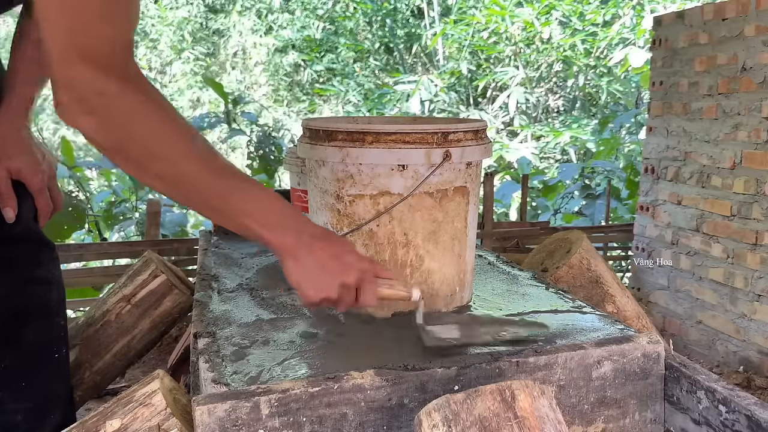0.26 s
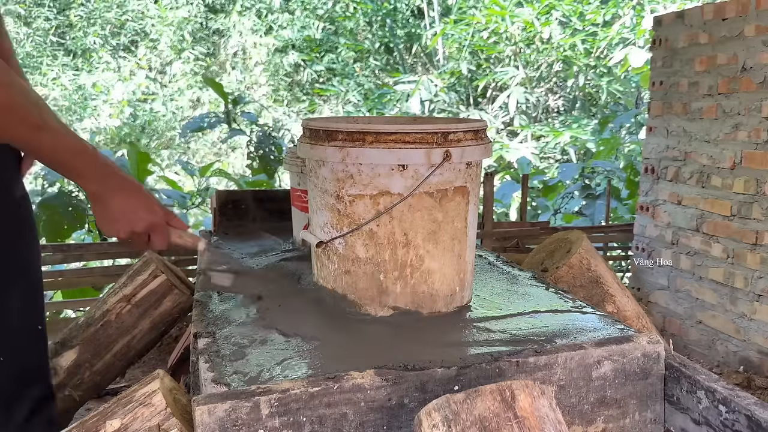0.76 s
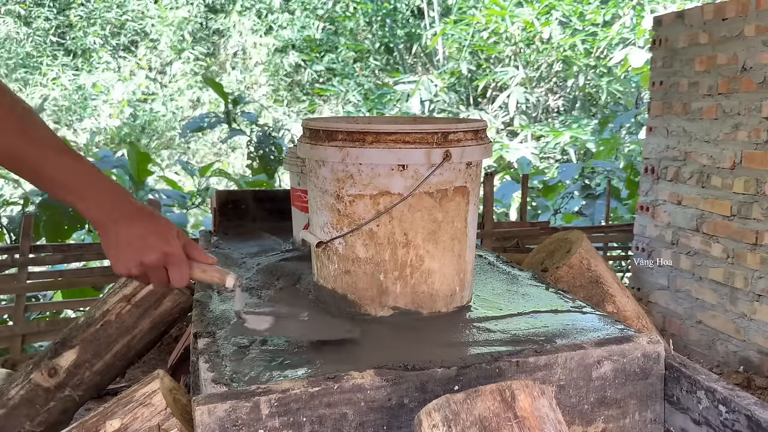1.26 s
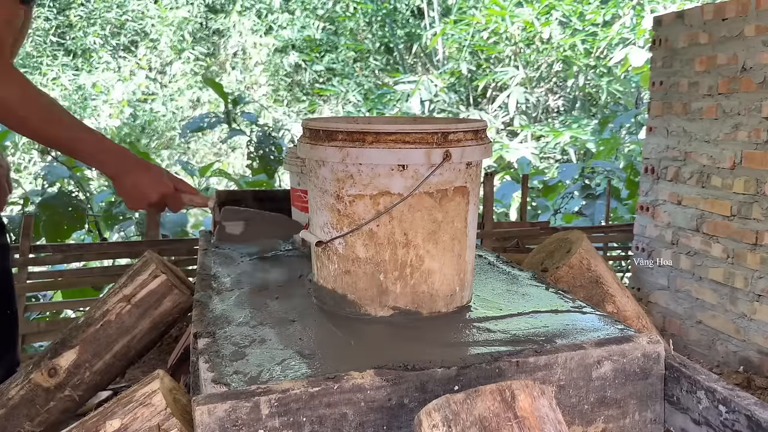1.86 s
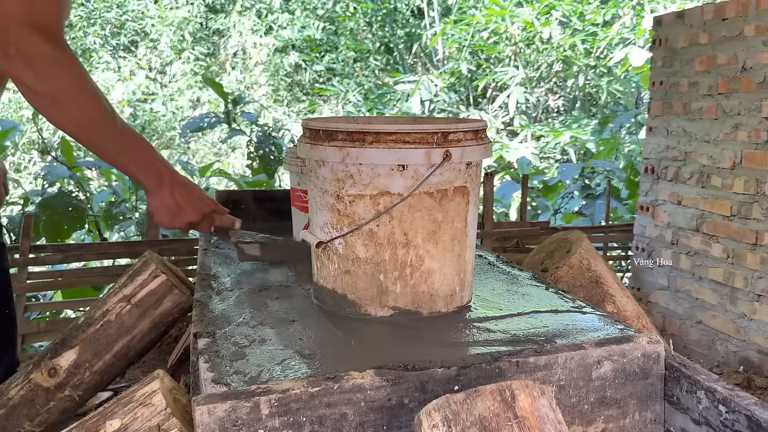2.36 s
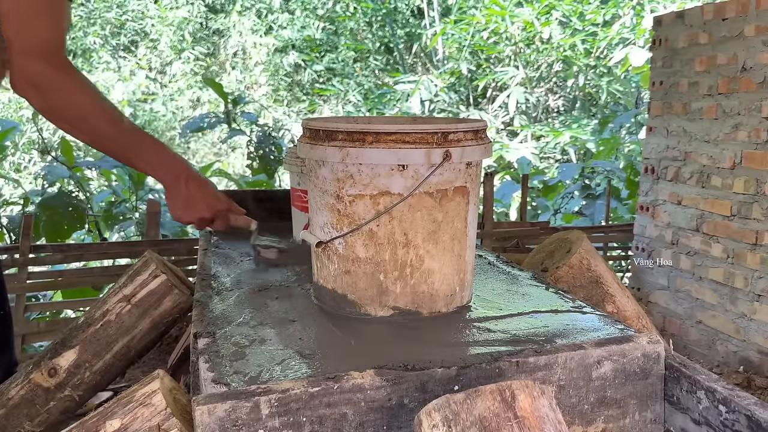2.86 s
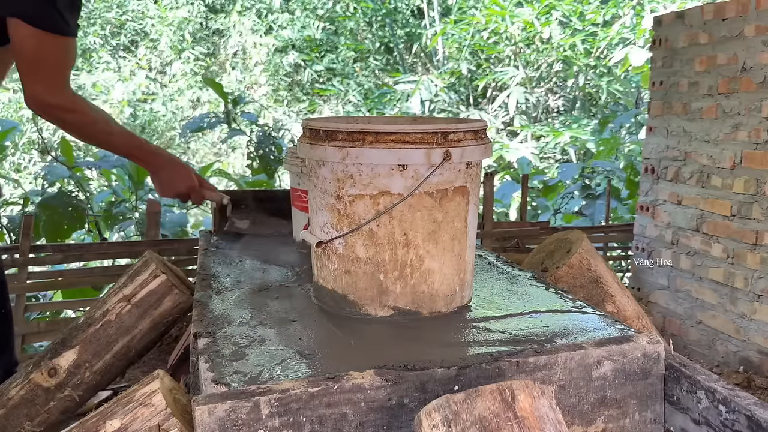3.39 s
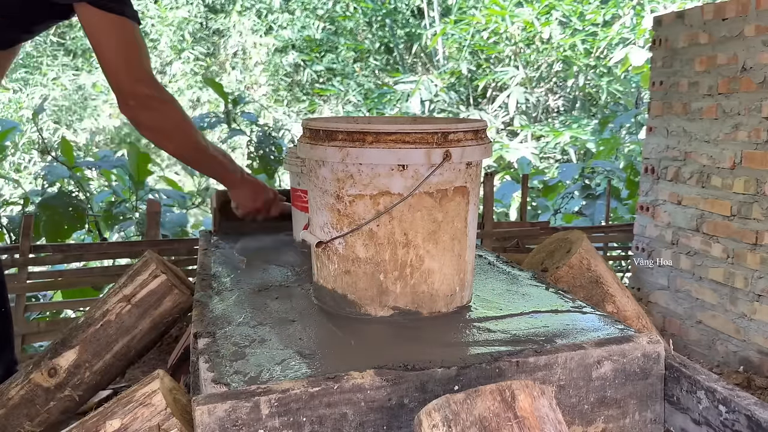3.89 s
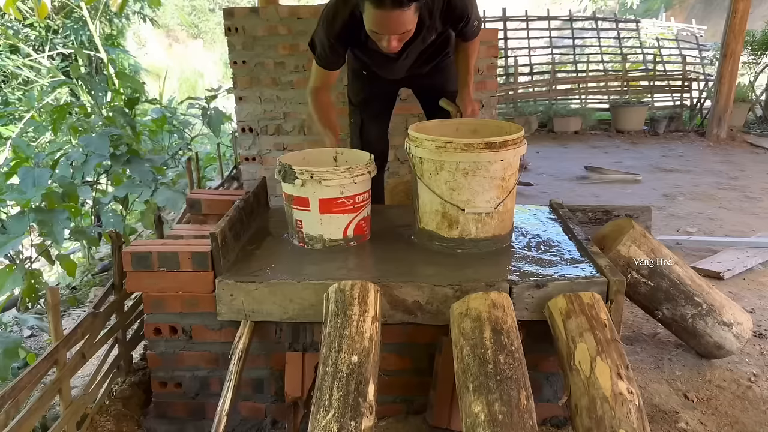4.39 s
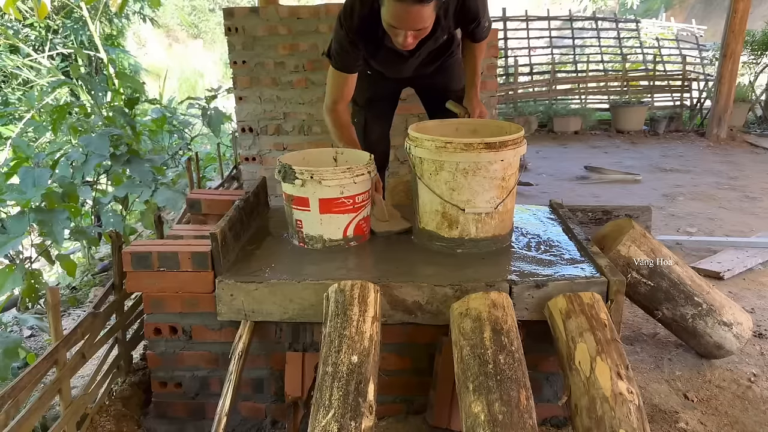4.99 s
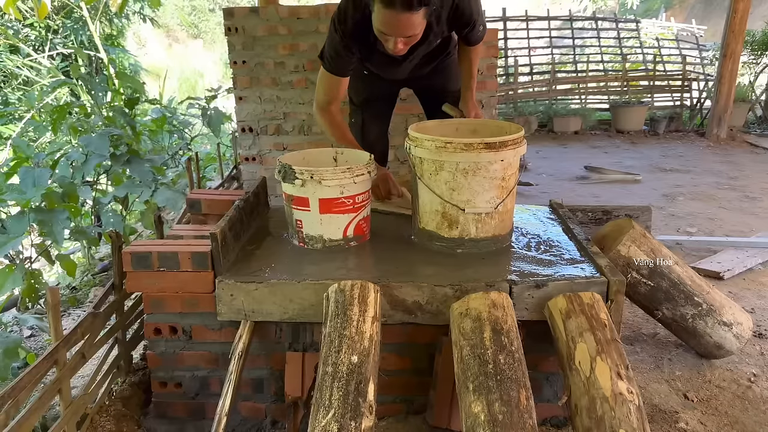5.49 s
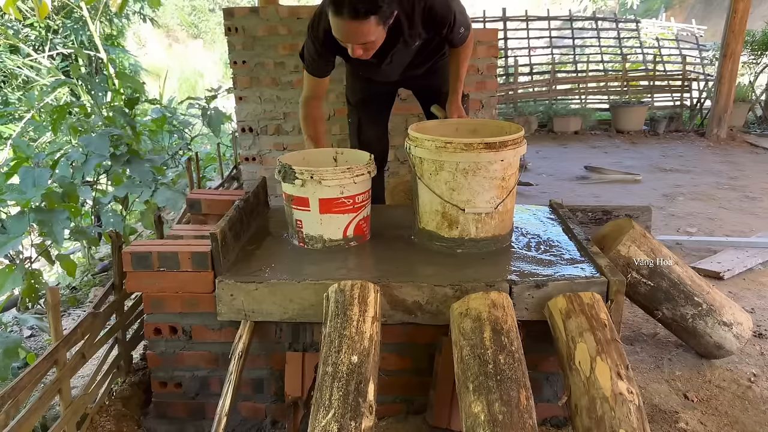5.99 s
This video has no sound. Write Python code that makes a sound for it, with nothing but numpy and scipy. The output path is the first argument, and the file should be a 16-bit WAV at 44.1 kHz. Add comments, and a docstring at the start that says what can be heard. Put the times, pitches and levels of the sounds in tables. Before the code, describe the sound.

A close, nearly dry outdoor stereo scene, the work leaning left, with continuous cricket trills and a blurred insect chorus very high up over quiet rumbling air and a faint low drone. After soft bumps, a steel trowel hits wet mortar hard at 0.45 s and skips in a rapid stutter to about 0.85 s, with a hollow bucket knock and short groans. A slap and scrape come at 1.5 s, the strongest clack and wet thud at 2.07 s, more slaps at 2.33 and 2.6 s, then a juddering, singing drag from 2.8 to 3.1 s. Lighter touches and a bucket bump follow to 3.7 s. Sound fades to silence around 4 s, then returns with altered, slightly stronger insects. Two faint bird notes sound at 4.5 and 4.8 s; light taps and low bucket knocks cluster at 4.7-5.1 s, a soft scuff at 5.2 s, a final knock and catch near 5.9 s.

```python
"""In a garden, a steel trowel taps, slaps and scrapes wet mortar on a slab while insects shrill in the bushes.
Touches and strokes are shaped noise through the damped modes of the blade, with pitched rings and groans.
Sinking tones make the mortar thuds, low hollow notes the bumped buckets, and a short noise tail the yard.
Behind lie cricket trills, a blurred insect chorus, two bird notes, soft bumps, a low drone and rumbling air.
The sound fades out and in again at a second spot, with other air and other insects."""
import sys
import numpy as np
from scipy import signal
from scipy.fft import rfft, irfft, next_fast_len
from scipy.io import wavfile
from scipy.ndimage import map_coordinates

SR = 44100
rng = np.random.default_rng(int(sys.argv[2]) if len(sys.argv) > 2 else 0)


def dump(signal):
    """Clip the signal to [-1, 1] and save it as 16-bit WAV at the path in sys.argv[1]."""
    limited = np.clip(np.atleast_2d(signal).T, -1, 1)
    pcm = np.round(limited * 32767).astype(np.int16)
    wavfile.write(sys.argv[1], SR, pcm)


N = 275625
TIME = np.arange(N) / SR

# All table levels are relative: the layers and filters below shape them further.
# single touches of the edge: start_s, level_db, edge_db, ring_hz
EDGE_TAPS = [(0.201, -50, 14.5, 2100), (0.43, -22, 1, 2050), (0.449, -11.5, -37, 437),
             (0.559, -33.5, 6.5, 990), (0.593, -28, -1, 514), (0.707, -18, -20, 960),
             (0.833, -22.5, -5, 1560), (1.354, -28.5, -1.5, 1445), (1.645, -22.5, -6.5, 1470),
             (1.685, -29.5, -6.5, 1970), (2.137, -19.5, -19, 958), (2.185, -34, -10, 1267),
             (2.376, -24, -13, 1550), (3.232, -27, -25.5, 1493), (3.25, -28.5, -29.5, 1570),
             (3.403, -46, -10, 908), (3.697, -34.5, 4, 2760), (4.683, -24.5, -14.5, 604),
             (4.742, -22, -39, 1005), (4.832, -20, -18, 1700), (4.868, -27, -13.5, 1316),
             (4.975, -23.5, -22, 1840), (5.075, -37, -0.5, 505.5), (5.847, -25.5, -4.5, 1770),
             (5.961, -38.5, 1, 1630)]
# the blade slapped down flat:
# start_s, level_db, edge_db, ring_hz, thud_db, thud_start_hz, heel_db, slide_db
FLAT_SLAPS = [(0.442, -9.5, -2, 502, -34, 473, -32.5, -35.5), (1.516, -10.5, -17, 948, -31, 120, -34, -44),
              (2.068, -4.5, -11.5, 1339, -15, 167, -11.5, -34),
              (2.332, -12, -15, 648, -21.5, 171, -35.5, -33.5),
              (2.598, -7, -8, 935, -24.5, 147.1, -14, -29),
              (2.789, -23.5, -9.5, 628, -31.5, 170.2, -66, -37.5),
              (3.138, -23, -13.5, 1150, -39.5, 199.8, -50, -47.5),
              (3.852, -20, -3, 1550, -32, 167, -23, -33.5)]
# strokes through the mortar:
# start_s, length_s, drag_db, grit_db, fizz_db, loss_over_stroke_db, pitch_hz, upper_pitch_hz
TROWEL_STROKES = [(0.512, 0.06, -25, -40, -36.5, 4.5, 560, 943),
                  (0.62, 0.029, -46, -48.5, -49.5, 2, 528, 950),
                  (0.675, 0.066, -36, -50, -46.5, -4.5, 540, 1000),
                  (0.775, 0.032, -69, -36.5, -46.5, 8, 824, 2780),
                  (1.41, 0.093, -50.5, -51.5, -49, -5, 715, 1400),
                  (1.55, .19, -41.5, -42, -41, 5.5, 616.6, 1405),
                  (2.112, 0.043, -27.5, -47.5, -49.5, 1.5, 898.7, 1348),
                  (2.875, 0.26, -34, -45.5, -53, 2, 680.7, 1349),
                  (3.2, 0.22, -44, -51.5, -55, 0.5, 1120, 2017),
                  (3.715, 0.021, -60, -39.5, -39.5, 10, 1260, 2890),
                  (4.85, 0.025, -43, -46, -57.5, 2, 1102, 1800),
                  (4.955, 0.06, -34, -43, -52.5, 2, 1155, 1731),
                  (5.635, 0.093, -67, -50, -58.5, -2, 1000, 1762),
                  (5.894, 0.011, -33, -41, -55, 4.5, 749, 1100)]
# brief groans as the blade catches: start_s, level_db, pitch_hz, upper_pitch_hz, upper_db
BLADE_CATCHES = [(0.591, -26.5, 500, 980, -3), (0.663, -33.5, 550, 990, -1), (0.706, -25, 535, 986, 0.5),
                 (0.722, -27.5, 556, 1154, 2), (1.517, -24, 512, 1406, -4), (0.741, -31, 530, 990, -6),
                 (2.071, -16, 639, 980, 3), (2.6, -19.5, 509, 1376, 6.5), (2.117, -27.5, 705, 1401, -9),
                 (2.15, -32, 640, 980, -1), (2.648, -20.5, 554, 1415, -13), (2.851, -25, 666, 1571, -7),
                 (2.865, -24.5, 680, 1530, -12), (2.880, -27, 720, 1666, -10),
                 (2.917, -22.5, 630, 1518, -13), (2.943, -30, 560, 1250, -13),
                 (2.969, -28.5, 690, 1190, -19), (2.996, -23, 732, 1550, -17),
                 (3.008, -23.5, 740, 1190, -7), (3.047, -30, 601, 1145, 3), (3.083, -26, 748, 1500, -18),
                 (3.119, -38.5, 636, 900, 3), (5.888, -35, 650, 1400, 6), (5.902, -34, 623, 1580, 2.5),
                 (5.910, -39, 773, 1102, 5)]
# damped modes of the blade on the slab: pitch_hz, width_hz, level_db
BLADE_MODES = [(534.5, 100, -4.5), (660, 50, -11.5), (964, 29, -14.5), (1276, 160, -7.5), (1394, 72, -9),
               (2172, 190, -11), (2760, 130, -11), (3368, 47, -11), (3940, 96, -12.5), (4702, 480, -5.5),
               (5420, 110, -14)]
# a soft scuff that swells and sinks: time_s, level_db
SCUFF_LEVEL = [(5.14, -47.5), (5.185, -49), (5.218, -37.5), (5.245, -50), (5.29, -61)]
# hollow knocks of a bumped bucket: start_s, level_db, pitch_hz, contact_db
BUCKET_KNOCKS = [(0.445, -18, 300, 6), (0.472, -30, 253, -13), (0.608, -32.5, 246, -24),
                 (1.514, -35, 207, -2), (2.073, -24.5, 351, 0), (3.477, -23.5, 232.4, -2),
                 (4.703, -25.5, 149.6, -4), (4.737, -32.5, 152.8, -14), (4.986, -30.5, 148, -10),
                 (5.144, -32, 148.3, -27), (5.655, -43, 266, -11), (5.856, -26.5, 150, 0.5)]
# trills of the nearer crickets: start_s, end_s, pulses_per_s, top_pitch_hz, level_db, left_minus_right_db
CRICKET_TRILLS = [(.033, 2.32, 24.9, 7920, -45, -6), (3.15, 3.96, 24.3, 7900, -45, -5),
                  (.016, 3.96, 23.5, 7670, -43.5, 1), (0, 3.96, 22.8, 7440, -45.5, 1),
                  (4.053, 6.25, 23.9, 7660, -40.5, 6), (4.02, 6.25, 22.6, 7480, -43.5, 3),
                  (4.03, 6.25, 25.1, 7950, -53, 4), (4.06, 6.25, 23.2, 8160, -54.5, -2.5),
                  (4.02, 6.25, 23.2, 6820, -50.5, 3)]
# the far insect chorus: start_s, end_s, pitch_hz, half_width_hz, level_db, left_minus_right_db
INSECT_BANDS = [(0, 4, 7455, 170, -47, 2.5), (4, 6.7, 7460, 178, -43.7, 5), (4, 5.4, 6780, 102, -51.5, -3)]
# notes of a small bird: start_s, level_db, pitch_hz, rise_over_note_hz
BIRD_NOTES = [(4.505, -54.5, 2770, 650), (4.781, -48, 2710, -120)]
# soft distant bumps: start_s, level_db, pitch_hz
SOFT_BUMPS = [(0.05, -41, 282), (0.137, -40, 286), (0.239, -39, 303), (0.338, -43, 396),
              (0.364, -33.5, 312), (1.181, -41.5, 382), (1.79, -40, 258), (1.868, -40.5, 290),
              (1.982, -36.5, 338), (3.735, -42.5, 320)]
# spells of a far low drone: start_s, end_s, level_db
DRONE_SPELLS = [(0.03, 0.984, -48), (2.07, 3.248, -43.5), (3.6, 3.964, -49.5)]

# colour of the blow's body: frequency_hz, level_db
BLOW_COLOUR = [(25, -38), (60, -9.5), (200, 1.5), (500, -3.5), (1000, 5), (1500, 2.5), (2200, 1.5),
               (3200, -2.5), (6000, -6.5), (16000, -51)]
# colour of the crushed edge: frequency_hz, level_db
EDGE_COLOUR = [(500, -20.5), (1500, -6.5), (2800, 5.5), (5500, -3), (8500, 3.5), (11000, -23.5),
               (14000, -2), (16000, -8)]
# colour of the dragging blade: frequency_hz, level_db
DRAG_COLOUR = [(40, -20), (90, -3.5), (250, 1.5), (400, 1), (600, -6.5), (1000, -1), (1500, 2.5),
               (2200, -4), (4000, -11), (9000, -49.5)]
# colour of the grit under it: frequency_hz, level_db
GRIT_COLOUR = [(600, -29.5), (1700, 6), (2800, 9.5), (4500, 5), (6500, 7), (9000, -33), (16000, -59)]
# colour of the wet film's fizz: frequency_hz, level_db
FIZZ_COLOUR = [(4000, -18.5), (8000, -2.5), (9500, 18), (11200, -35), (13000, 10), (15500, 10.5)]
# colour of the air at the first spot: frequency_hz, level_db
FIRST_AIR = [(25, -18), (55, 4.5), (82, 3.5), (120, 0.5), (300, -3.5), (450, -5.5), (800, -12), (1400, -11),
             (3300, -14), (4300, -15), (6500, -12), (8200, -8.5), (10500, -87.5), (13000, -16.5),
             (15500, -12)]
# colour of the air at the second spot: frequency_hz, level_db
SECOND_AIR = [(25, -21), (55, -1), (88, 4.5), (120, -3), (300, -3.5), (550, -10), (850, -15), (1300, -10),
              (2200, -15.5), (4000, -18.5), (6000, -19.5), (8200, -30), (10500, -90), (13000, -25.5),
              (15500, -20)]
# further colours: frequency_hz, level_db
SQUASH_COLOUR = [(30, -24.5), (70, 11.0), (170, 11.0), (300, -1.5), (600, -18.5), (1500, -55)]
SCUFF_COLOUR = [(150, -13.5), (350, 4.0), (700, 1.0), (1100, 1.5), (1500, -6.5), (3000, -46.5)]
BUCKET_CONTACT = [(150, -4.5), (300, 2.5), (650, -6.5), (1100, -12.0), (1800, -54.0)]
BUCKET_SHOVE = [(30, -29.0), (75, 10.0), (280, -1.5), (600, -62.0)]
DRONE_COLOUR = [(150, -23.5), (250, 6.0), (340, 5), (400, 3.0), (520, -53)]

# how alike the two ears hear the air: frequency_hz, likeness (0 to 1)
AIR_LIKENESS = [(60, 0.91), (170, 0.65), (350, 0.26), (700, 0), (16000, 0.55)]
# how alike the two ears hear the work: frequency_hz, likeness (0 to 1)
WORK_LIKENESS = [(60, 1), (300, 1), (700, 0.61), (1400, 0.55), (3000, 0.44), (16000, 0.41)]
# likeness of the drone at the two ears: frequency_hz, likeness (0 to 1)
DRONE_LIKENESS = [(300, 0.15)]
# tilt of the whole picture to the left: frequency_hz, left_minus_right_db
LEFT_TILT = [(80, 2), (350, 2), (1300, 3.5), (2800, 1.5), (4500, 4.5), (6000, 6), (7600, 2), (9000, -0.5)]
# decay of the yard: frequency_hz, t60_s
YARD_DECAY = [(150, 0.24), (1500, 0.07), (10000, 0.12)]

# The heel lands after the tip, duller and lower.
HEEL_LAG_S, HEEL_EDGE_DB, HEEL_HZ = 0.049, -28.5, 531
# The slide after a slap; grit and fizz are relative to its drag.
SLIDE_S, SLIDE_GRIT_DB, SLIDE_FIZZ_DB, SLIDE_LOSS_DB, SLIDE_UPPER_HZ = 0.054, -8, -10, 4.5, 1400
# A stroke's rise and release; its pitch climbs by a share of itself each second.
PRESS_S, LIFT_T60_S, GLIDE_PER_S = 0.025, 0.23, 0.15
# A run of skips along the mortar, each weaker and duller than the last; the blade groans at each.
SKIP_START_S, SKIP_GAP_S, SKIP_HZ, SKIP_UPPER_HZ = 0.495, 0.0345, 530, 933
SKIP_DB, SKIP_EDGE_DB, SKIP_LOSS_DB, SKIP_DULL_DB = -13.5, -3, 1, 6
SKIP_GROAN_DB, SKIP_UPPER_DB = -22.5, -2.5
SECOND_SPOT_S, FADE_OUT_S, SILENCE_S, FADE_IN_S = 3.99, 0.14, 0.028, 0.06
CEILING, TOP_HZ = 0.98, 16100  # clip level (full scale 1) and band limit


def taps(crush_s, rise_s, blow_t60, edge_t60, ring_t60, blow_db, crack_db, ring_db, tail_db, tail_t60, bright_hz):
    """The edge crushes sand for a few milliseconds; the blade rings at a pitch set by where it lands."""
    out, rings, t = np.zeros((2, N)), np.zeros(N), np.arange(SR // 4) / SR
    blow, edge = rush(BLOW_COLOUR, WORK_LIKENESS), rush(EDGE_COLOUR, WORK_LIKENESS)
    onset = 1 - np.exp(-t / rise_s)
    after = np.maximum(t - crush_s, 0)
    tail = amp(tail_db - 60 * t / tail_t60)
    for s, db, edge_db, hz in contacts(count=3):
        # the less the edge bites, the softer and duller the blow
        cutoff_hz = min(bright_hz * np.sqrt(amp(edge_db)), SR / 3)
        softness = signal.butter(2, cutoff_hz, fs=SR)
        soft_blow = signal.lfilter(*softness, excerpt(blow, s, t))
        body = amp(blow_db) * (amp(-60 * after / blow_t60) + tail) * soft_blow
        crack = amp(edge_db + crack_db) * (amp(-60 * after / edge_t60) + tail) * excerpt(edge, s, t)
        add(out, s, amp(db) * onset * (body + crack))
        ring = amp(db + ring_db - 60 * t / ring_t60) * np.sin(2 * np.pi * hz * t)
        add(rings, s, onset * ring)
    return blade(out, direct_db=-9.0, ring_db=-5) + rings


def contacts(count):
    """Every touch of steel: taps, the tip and heel of each slap, and a run of skips."""
    tips = [slap[:4] for slap in FLAT_SLAPS]
    heels = [(s + HEEL_LAG_S, heel_db, HEEL_EDGE_DB, HEEL_HZ) for s, *_, heel_db, _ in FLAT_SLAPS]
    skips = [(SKIP_START_S + k * SKIP_GAP_S, SKIP_DB - k * SKIP_LOSS_DB,
              SKIP_EDGE_DB - k * SKIP_DULL_DB, SKIP_HZ) for k in range(count)]
    return EDGE_TAPS + tips + heels + skips


def clacks(clack_db, t60, vary_db, detune):
    """A flat slap strikes all the blade's modes at once, in a new balance; the narrow ones ring longest."""
    out, t = np.zeros(N), np.arange(SR // 4) / SR
    hz, width, level = np.transpose(BLADE_MODES)[:, :, None]
    life = t60 * np.sqrt(np.median(width) / width)
    for s, db, *_ in FLAT_SLAPS:
        loud, high, flip = rng.standard_normal((3, len(BLADE_MODES), 1))
        decay = amp(level + vary_db * loud - 60 * t / life)
        modes = decay * np.sign(flip) * np.sin(2 * np.pi * hz * (1 + detune * high) * t)
        add(out, s, amp(db + clack_db) * modes.sum(axis=0))
    return out


def scrapes(grain_db, lump_db, drag_db, grit_db, fizz_db, sing_db, upper_db, sing_knots_per_s, sand_db):
    """The blade judders over sand grains and rings where it is pressed; the wet film fizzes behind it."""
    (drag_level, grit_level, fizz_level), pitches = pressure()
    judder = slips(rate=80, slip_s=0.005, spread_db=3, steady=0.15)
    push = drag_level * judder * unit(amp(lump_db * wobble(70)))
    drag = amp(drag_db) * push * rush(DRAG_COLOUR, WORK_LIKENESS)
    grit_grain = unit(judder ** 0.26 * amp(grain_db * wobble(900)))
    grit = amp(grit_db) * grit_level * grit_grain * rush(GRIT_COLOUR, WORK_LIKENESS)
    fizz_grain = unit(amp(grain_db * wobble(990)))
    fizz = amp(fizz_db) * fizz_level * fizz_grain * rush(FIZZ_COLOUR, WORK_LIKENESS)
    snaps = sand(rate=220, mean_hz=1130, spread=2.37, cycles=12, size_db=15)
    grains = amp(sand_db) * drag_level * snaps
    # narrow noise around each of the blade's two pitches
    low, high = [unit(wobble(sing_knots_per_s) * np.cos(phase) + wobble(sing_knots_per_s) * np.sin(phase))
                 for phase in 2 * np.pi * np.cumsum(pitches, axis=1) / SR]
    singing = push * (amp(sing_db) * low + amp(upper_db) * high)
    return blade(drag + grit + grains, direct_db=-1.5, ring_db=-9.5) + fizz + singing


def pressure():
    """Drag, grit and fizz gains and two pitches: each stroke or slide is pressed, held and lifted."""
    slides = [(s + PRESS_S, SLIDE_S - PRESS_S, db, db + SLIDE_GRIT_DB, db + SLIDE_FIZZ_DB,
               SLIDE_LOSS_DB, hz, SLIDE_UPPER_HZ) for s, _, _, hz, *_, db in FLAT_SLAPS]
    levels, pitches = np.zeros((3, N)), np.zeros((2, N))
    t = np.arange(SR // 2) / SR - PRESS_S
    for s, length, *layers_db, loss_db, hz, upper_hz in sorted(TROWEL_STROKES + slides):
        held = np.clip(t, 0, length)
        lift = np.maximum(t - length, 0)
        shape = np.minimum(1 + t / PRESS_S, 1) * amp(-loss_db * held / length - 60 * lift / LIFT_T60_S)
        add(levels, s - PRESS_S, amp(layers_db)[:, None] * shape)
        # a new stroke takes the pitches over from the one before
        rest = pitches[:, round((s - PRESS_S) * SR):][:, :len(t)]
        rest[:] = np.outer([hz, upper_hz], 1 + GLIDE_PER_S * held)[:, :rest.shape[1]]
    return levels, pitches


def slips(rate, slip_s, spread_db, steady):
    """Stick and slip at uneven intervals: each slip starts sharply and fades."""
    starts = np.cumsum(rng.uniform(0.4, 1.6, 2000) / rate)
    strengths = amp(spread_db * rng.standard_normal(len(starts)))
    kicks = np.bincount(np.minimum(starts * SR, N).astype(int), strengths, N + 1)[:N]
    return unit(steady + signal.lfilter([1], [1, -np.exp(-1 / (slip_s * SR))], kicks))


def sand(rate, mean_hz, spread, cycles, size_db):
    """Wet grains snap out from under the blade, each a few cycles of a damped note; rms 1."""
    out, t = np.zeros(N), np.arange(SR // 40) / SR
    for when, high, big in rng.uniform(size=(int(rate * N / SR), 3)):
        hz = mean_hz * spread ** (2 * high - 1)
        add(out, when * N / SR, amp(size_db * big - 60 * hz * t / cycles) * np.sin(2 * np.pi * hz * t))
    return unit(out)


def catches(swell_s, t60, rub_db, sag_per_s, count):
    """The blade digs in and springs free: two of its notes swell briefly and die in the wet mortar."""
    out, t = np.zeros((2, N)), np.arange(SR // 8) / SR
    rub = rush(DRAG_COLOUR, WORK_LIKENESS)
    roughness = unit(1 + wobble(330))  # sand roughens the upper note
    shape = np.minimum(t / swell_s, 1) * amp(-60 * np.maximum(t - swell_s, 0) / t60)
    turn = 2 * np.pi * t * (1 - sag_per_s * t / 2)  # both pitches sag
    skips = [(SKIP_START_S + k * SKIP_GAP_S, SKIP_GROAN_DB, SKIP_HZ, SKIP_UPPER_HZ, SKIP_UPPER_DB)
             for k in range(count)]
    for s, db, hz, upper_hz, upper_db in BLADE_CATCHES + skips:
        upper = amp(upper_db) * excerpt(roughness, s, t) * np.sin(upper_hz * turn)
        groan = np.sin(hz * turn) + upper + amp(rub_db) * excerpt(rub, s, t)
        add(out, s, amp(db) * shape * groan)
    return out


def blade(x, direct_db, ring_db):
    """Contact noise leaves partly at once, partly through the damped modes of the blade."""
    def response(f):
        modes = sum(amp(db) * 1j * f * width / (hz * hz - f * f + 1j * f * width)
                    for hz, width, db in BLADE_MODES)
        return amp(direct_db) + amp(ring_db) * modes
    return filtered(x, response)


def scuff():
    """Something soft is dragged over the mortar: dull, with no grit."""
    level = amp(np.interp(TIME, *np.transpose(SCUFF_LEVEL), left=-120, right=-120))
    return level * rush(SCUFF_COLOUR, WORK_LIKENESS)


def pats(lag_s, end_hz, settle_s, rise_s, swell_s, t60, pat_db, squash_db):
    """Wet mortar gives way under the blade: a dull thud whose pitch sinks."""
    out, t = np.zeros((2, N)), np.arange(SR // 3) / SR
    squash = rush(SQUASH_COLOUR, WORK_LIKENESS)
    for s, _, _, _, db, start_hz, _, _ in FLAT_SLAPS:
        hz = end_hz + (start_hz - end_hz) * np.exp(-t / settle_s)
        push = np.minimum(t / rise_s, 1) * amp(db - 60 * np.maximum(t - swell_s, 0) / t60)
        tone = amp(pat_db) * np.sin(2 * np.pi * np.cumsum(hz) / SR)
        wet = amp(squash_db - 60 * t / 0.32) * excerpt(squash, s, t)
        add(out, s + lag_s, push * (tone + wet))
    return out


def knocks(t60, knock_db, upper_db, shove_db):
    """A dull contact shoves the bucket and wakes a low hollow note with a weaker upper one."""
    out, t = np.zeros((2, N)), np.arange(SR // 3) / SR
    contact, shove = rush(BUCKET_CONTACT, WORK_LIKENESS), rush(BUCKET_SHOVE, WORK_LIKENESS)
    onset = 1 - np.exp(-t / 0.0045)
    for s, db, hz, contact_db in BUCKET_KNOCKS:
        ring = np.sin(2 * np.pi * hz * t) + amp(upper_db) * np.sin(2 * np.pi * 1.8 * hz * t)
        touch = amp(contact_db - 60 * t / 0.067) * excerpt(contact, s, t)
        push = amp(shove_db - 60 * t / 0.22) * excerpt(shove, s, t)
        add(out, s, amp(db) * onset * (amp(knock_db - 60 * t / t60) * ring + touch + push))
    return out


def from_left(x, lead_s):
    """The left ear hears the work a little earlier."""
    return filtered(x, lambda hz: np.exp(1j * np.pi * hz * lead_s * np.array([[1], [-1]])))


def yard(x):
    """The brick wall and roof answer briefly: a noise tail that decays at its own pace in each band."""
    hz, _, bands = signal.stft(rng.standard_normal((2, SR // 3)), SR, nperseg=256)
    t = _
    decay = amp(-60 * t / along(YARD_DECAY, hz)[:, None])
    tail = signal.istft(bands * decay, SR, nperseg=256)[1]
    tail = np.pad(tail / np.linalg.norm(tail[0]), ((0, 0), (300, 0)))  # it starts 300 samples late
    return signal.fftconvolve(x, tail, axes=1)[:, :N]


def crickets(pulse_s, crest, bend_hz, drift, uneven_db, scatter_db):
    """Each wing stroke whistles, bends up a little and falls away; the leaves scatter part of it."""
    out, u = np.zeros((2, N)), np.linspace(0, 1, int(pulse_s * SR))
    swell = np.sqrt(abs(np.sin(np.pi * u)))
    bend = bend_hz * ((u - crest) / (1 - crest)) ** 2
    for start, end, rate, hz, db, left_db in CRICKET_TRILLS:
        for k, (late, high, loud) in enumerate(rng.standard_normal(size=(100, 3))):
            s = start + (k + late / 50) / rate
            if s < end:
                gain = amp(db + uneven_db * loud + np.array([[left_db], [-left_db]]) / 2)
                pitch = hz * (1 + drift * high) - bend
                add(out, s, gain * swell * np.sin(2 * np.pi * np.cumsum(pitch) / SR))
    return out + amp(scatter_db) * yard(out)


def insects(waver_db):
    """Many far voices merge into narrow shrill bands, different on the way to each ear."""
    out = np.zeros((2, N))
    for start, end, hz, width, db, left_db in INSECT_BANDS:
        noise = rng.standard_normal((2, N))
        voice = unit(filtered(noise, lambda f: 1 / (1 + ((f - hz) / width) ** 2)))
        sounding = (TIME >= start) * (TIME < end)
        pan_db = np.array([[left_db], [-left_db]]) / 2
        out += voice * sounding * amp(db + waver_db * wobble(6.8) + pan_db)
    return out


def bird(length_s, dip_hz):
    """Short whistles that dip and rise again."""
    out, u = np.zeros(N), np.linspace(0, 1, int(length_s * SR))
    arch = np.sin(np.pi * u)
    for s, db, hz, rise_hz in BIRD_NOTES:
        pitch = hz + dip_hz * (1 - arch) + rise_hz * (u - 0.5)
        add(out, s, amp(db) * arch * np.sin(2 * np.pi * np.cumsum(pitch) / SR))
    return out


def bumps(t60, rise_s):
    """Each bump is a few cycles of a damped low note."""
    out, t = np.zeros(N), np.arange(SR // 5) / SR
    for s, db, hz in SOFT_BUMPS:
        shape = np.minimum(t / rise_s, 1) * amp(db - 60 * np.maximum(t - rise_s, 0) / t60)
        add(out, s, shape * np.sin(2 * np.pi * hz * t))
    return out


def drone(swell_db, waver_db):
    """A narrow low band that swells and sinks once in each spell, wavering as it goes."""
    band = rush(DRONE_COLOUR, DRONE_LIKENESS)
    level = np.zeros(N)
    for start, end, db in DRONE_SPELLS:
        arch = np.sin(np.linspace(0, np.pi, round((end - start) * SR)))
        add(level, start, amp(db + swell_db * (np.sqrt(abs(arch)) - 1)))
    return level * band * amp(waver_db * wobble(22.02))


def garden(first_db, second_db):
    """Distant rumble, leaves and a thin high hiss, different at the two spots."""
    first = amp(first_db) * rush(FIRST_AIR, AIR_LIKENESS)
    second = amp(second_db) * rush(SECOND_AIR, AIR_LIKENESS)
    return np.where(TIME < SECOND_SPOT_S, first, second) * amp(0.26 * wobble(1.48) + 0.21 * wobble(15))


def rush(spectrum, alike):
    """Coloured stereo noise of rms 1; the mid-side balance sets how alike the ears are."""
    def mid_side(hz):
        turn = np.arccos(np.clip(along(alike, hz), -1, 1)) / 2
        return amp(along(spectrum, hz)) * [np.cos(turn), np.sin(turn)]
    mid, side = filtered(rng.standard_normal((2, N)), mid_side)
    return unit(np.array([mid + side, mid - side]))


def amp(db):
    """Decibels to gain."""
    return 10 ** (np.asarray(db) / 20)


def unit(x):
    """Scale to rms 1."""
    return x / np.sqrt(np.mean(x ** 2) + 1e-20)


def along(points, hz):
    """Read a (frequency_hz, value) curve on a log frequency axis."""
    f, v = np.transpose(points)
    return np.interp(np.log(hz + 1), np.log(f + 1), v)


def wobble(rate):
    """A smooth random curve, rate knots a second."""
    return map_coordinates(rng.standard_normal(int(N * rate / SR) + 4), [TIME * rate])


def filtered(x, response):
    """Shape x by a response of frequency."""
    m = next_fast_len(x.shape[-1] + 8192)
    return irfft(rfft(x, m) * response(np.fft.rfftfreq(m, 1 / SR)), m)[..., :x.shape[-1]]


def excerpt(track, s, t):
    """The stretch of a track from time s, as long as t, wrapping at the end."""
    return track[..., (round(s * SR) + np.arange(len(t))) % N]


def add(track, s, sound):
    """Mix a sound into a track from time s."""
    part = track[..., max(round(s * SR), 0):][..., :sound.shape[-1]]
    part += sound[..., :part.shape[-1]]


def scene():
    """Mix the trowel work, its answer from the yard and the garden around it, tilted left."""
    blows = taps(crush_s=0.0023, rise_s=0.0009, blow_t60=0.068, edge_t60=0.033, ring_t60=0.029, blow_db=-2,
                 crack_db=6.5, ring_db=-1.0, tail_db=-21.5, tail_t60=0.21, bright_hz=9700)
    blows = blows + clacks(clack_db=-7, t60=0.048, vary_db=4, detune=0.0098)
    strokes = scrapes(grain_db=3.5, lump_db=0.5, drag_db=-5.5, grit_db=3.0, fizz_db=2.0, sing_db=-12.5,
                      upper_db=-10.5, sing_knots_per_s=110, sand_db=-10)
    groans = catches(swell_s=0.0029, t60=0.037, rub_db=-11, sag_per_s=1.0, count=3)
    work = from_left(blows + strokes + groans + scuff(), lead_s=0.00009)
    thuds = pats(lag_s=0.00896, end_hz=80, settle_s=0.01265, rise_s=0.016, swell_s=0.032, t60=0.18,
                 pat_db=-2.5, squash_db=-2.0)
    buckets = knocks(t60=0.15, knock_db=1.5, upper_db=-13.5, shove_db=-5.0)
    outdoors = crickets(pulse_s=0.021, crest=0.38, bend_hz=330, drift=0.003, uneven_db=1.8, scatter_db=-2)
    outdoors = outdoors + insects(waver_db=1.0)
    outdoors = outdoors + bird(length_s=0.042, dip_hz=250)
    outdoors = outdoors + bumps(t60=0.09, rise_s=0.0065)
    outdoors = outdoors + drone(swell_db=11.5, waver_db=2.5)
    outdoors = outdoors + garden(first_db=-45.4, second_db=-46.8)
    mix = work + thuds + buckets + amp(-7.5) * yard(work) + outdoors
    return filtered(mix, lambda hz: amp(np.array([[1], [-1]]) * along(LEFT_TILT, hz) / 2))


def record(dry):
    """A fade through silence joins the two spots; the hardest peaks clip; the band limit cuts the top."""
    away = np.maximum(abs(TIME - SECOND_SPOT_S) - SILENCE_S / 2, 0)
    fade_out = np.minimum(away / FADE_OUT_S, 1)
    fade_in = 1 - np.exp(-away / FADE_IN_S)
    faded = dry * np.where(TIME < SECOND_SPOT_S, fade_out, fade_in)
    return filtered(np.clip(faded, -CEILING, CEILING), lambda hz: hz < TOP_HZ)


dry = scene()
out = record(dry)
dump(out)
```